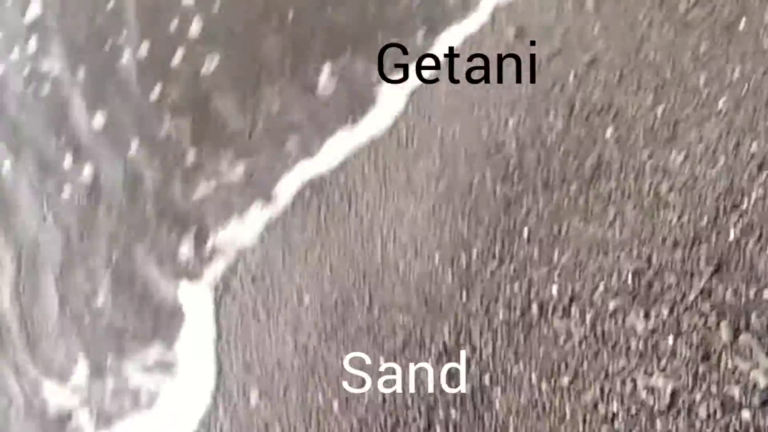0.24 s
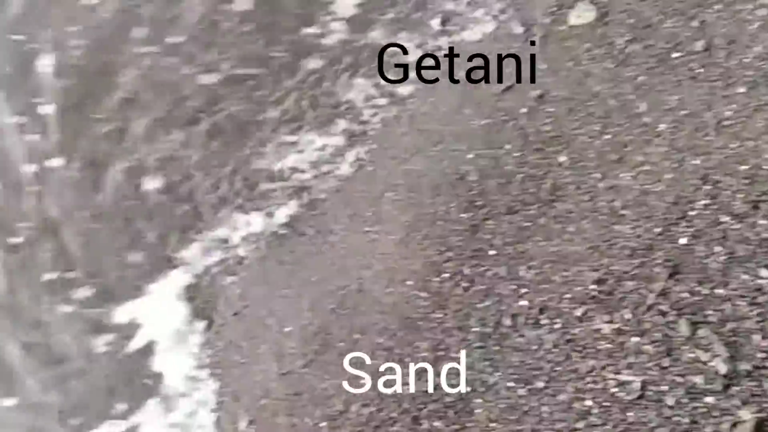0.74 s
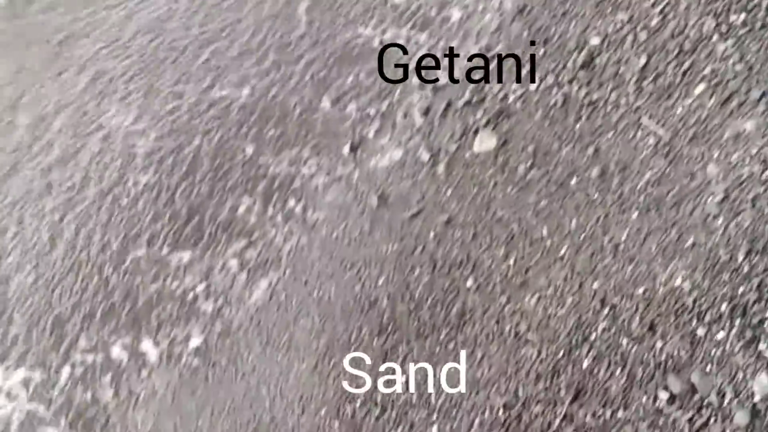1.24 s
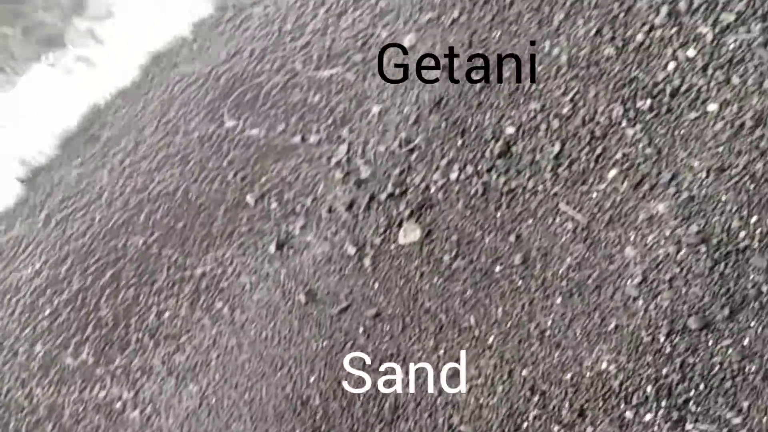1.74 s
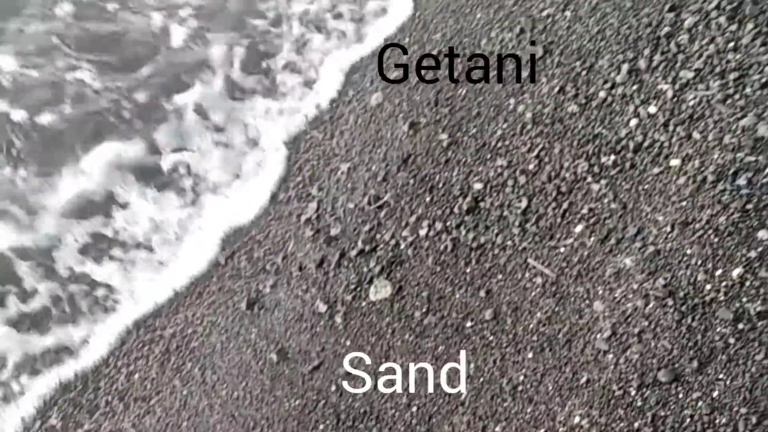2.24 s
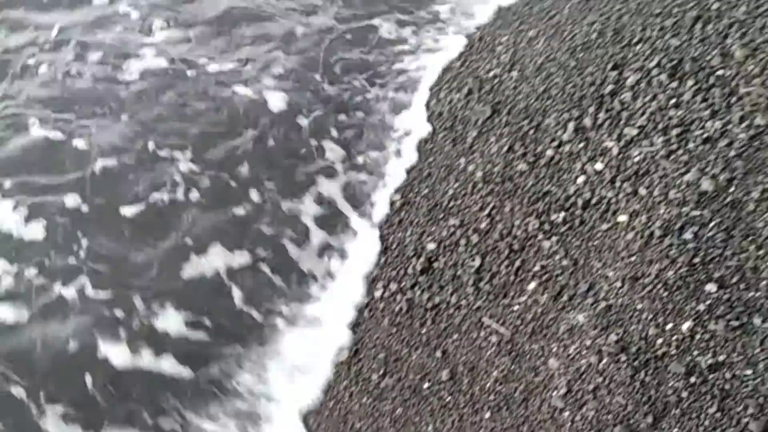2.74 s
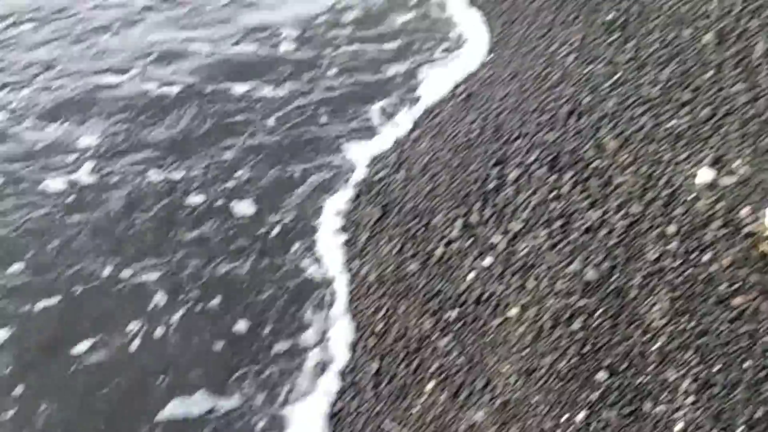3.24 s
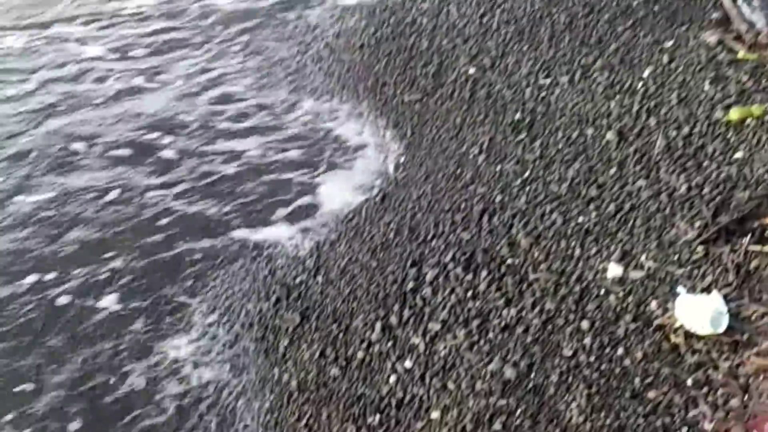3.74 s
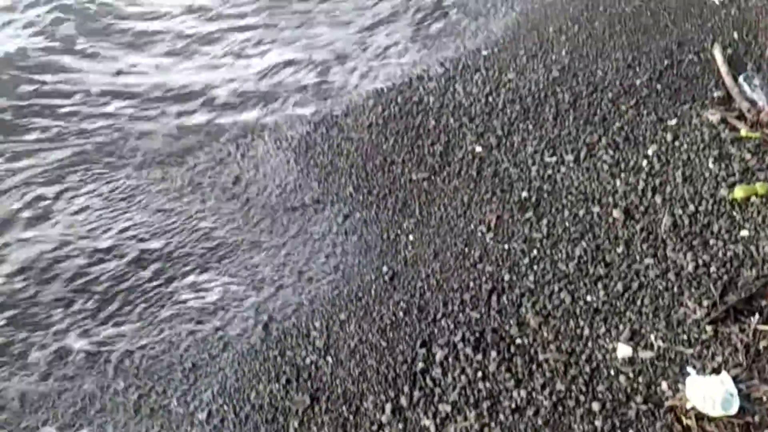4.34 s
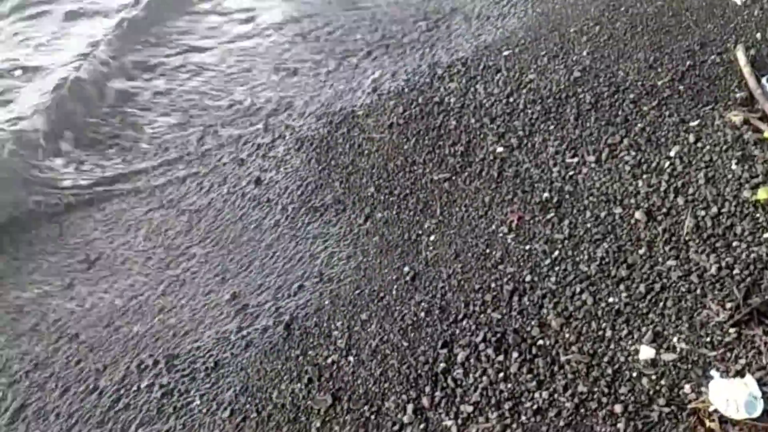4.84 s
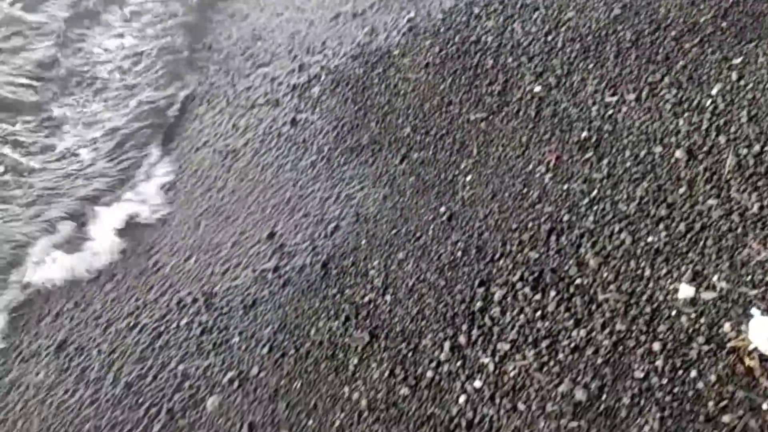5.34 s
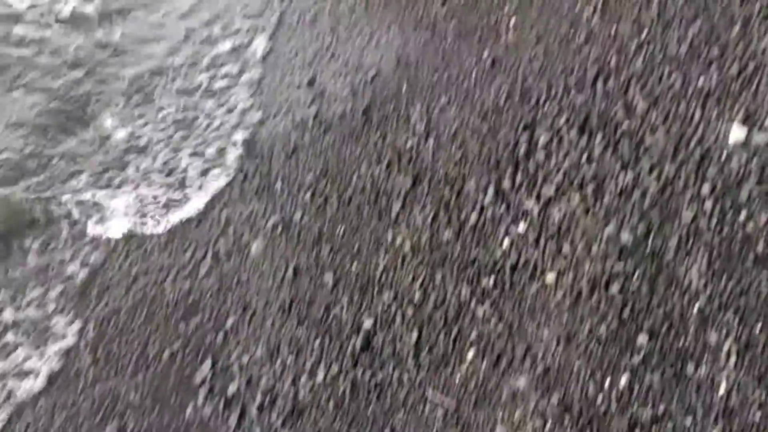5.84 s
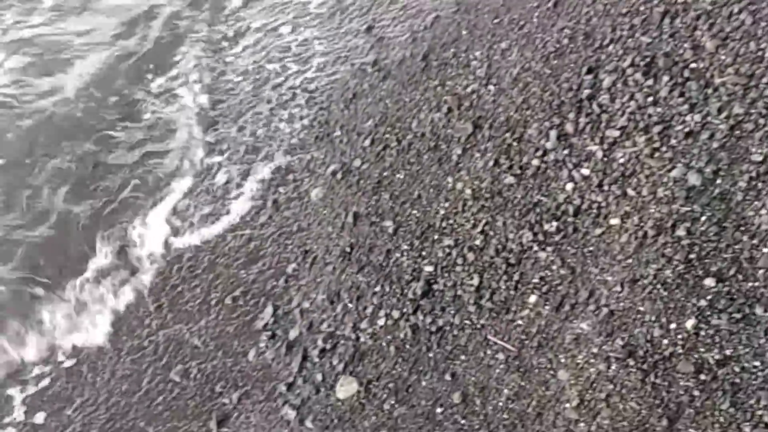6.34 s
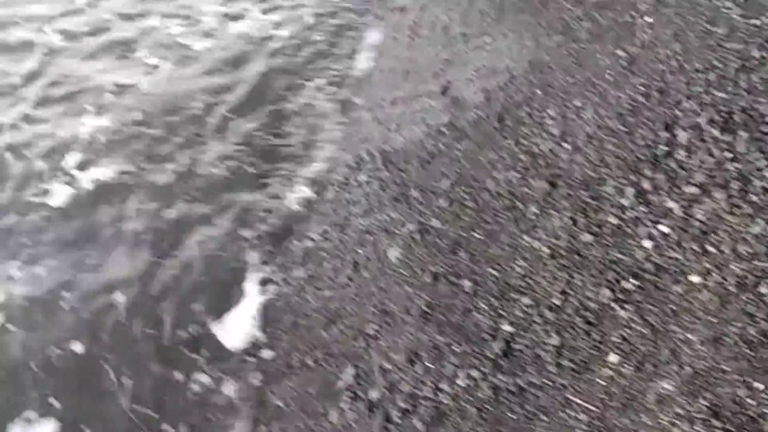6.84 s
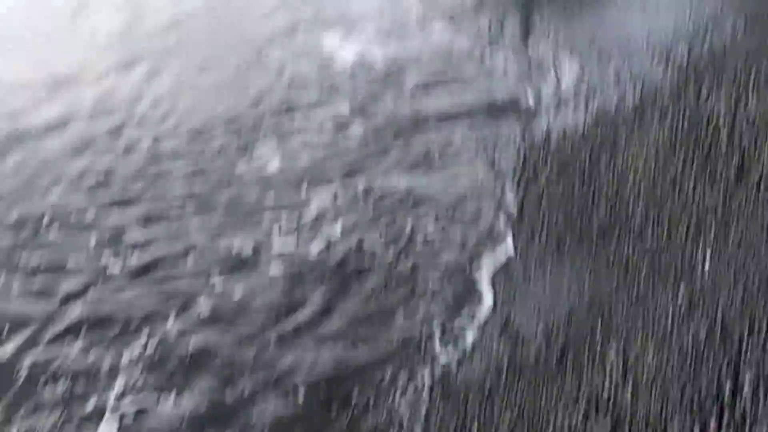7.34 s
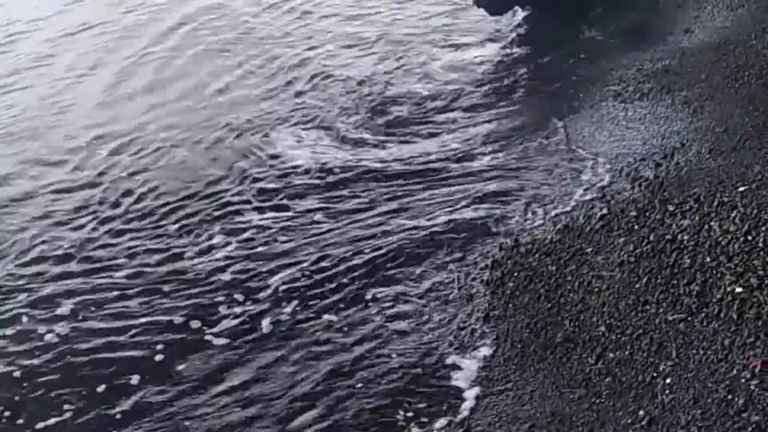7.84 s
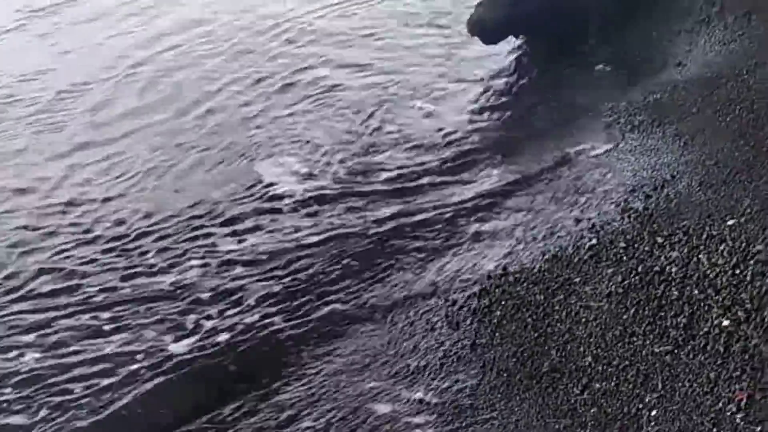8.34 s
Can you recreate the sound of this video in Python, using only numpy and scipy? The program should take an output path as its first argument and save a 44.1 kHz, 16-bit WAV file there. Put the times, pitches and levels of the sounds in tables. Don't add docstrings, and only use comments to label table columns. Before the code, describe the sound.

Outdoors by the water, wavelets hiss up dark pebbles and recede, bubbling between the stones, with a sharp wet knock early on and faint chirps.

```python
import sys
import numpy as np
from scipy import signal
from scipy.fft import rfft, irfft, next_fast_len
from scipy.io import wavfile
from scipy.ndimage import map_coordinates

SR = 44100
rng = np.random.default_rng(int(sys.argv[2]) if len(sys.argv) > 2 else 0)


def transcribe(signal):
    frames = np.atleast_2d(signal).T
    limited = np.clip(frames, -1, 1)
    pcm = np.round(limited * 32767).astype(np.int16)
    wavfile.write(sys.argv[1], SR, pcm)


def gain_from_db(level_db):
    decades = np.asarray(level_db, float) / 20
    return 10 ** decades


N = 379260
SLOW_STEP = 40

# start_s, left_lag_ms, spray_db caught, surge_db caught
BEARING = [(0.0, -0.27, 0.5, 1.9), (0.9, -0.22, -0.5, -3.0), (1.3, -0.22, 1.2, 1.7), (1.55, 0.3, -1.4, 2.3),
           (2.5, 0.39, 2.6, 7.7), (3.0, 0.38, 0.4, 5.1), (3.4, 0.37, 2.7, 1.2), (4.0, 0.3, 3.3, 2.5),
           (4.5, -0.16, 4.7, 2.0), (5.2, -0.13, -1.0, -1.7), (6.0, -0.33, -1.7, -1.8),
           (6.4, -0.34, -1.2, -3.9), (7.0, -0.35, -2.9, -7.0), (7.6, -0.1, -5.3, 3.7),
           (8.6, -0.22, 2.1, 2.6)]
LAG_BAND_HZ = (380, 5700)
# crest_s, foam_db, build_s and drain_s per 10 dB, depth_db of extra body
WAVELETS = [(0.045, -63.4, 0.27, 0.09, 4.0), (0.323, -51.9, 0.05, 0.13, -4.2),
            (0.485, -51.2, 0.15, 0.8, 3.1), (0.836, -48.8, 0.25, 0.03, 4.5),
            (0.947, -42.3, 0.21, 0.85, -1.0), (1.234, -37.5, 0.32, 0.35, 0.9),
            (1.37, -37.0, 0.09, 0.32, -1.9), (1.575, -30.8, 0.06, 0.05, 0.8),
            (1.672, -36.2, 0.16, 0.27, -4.0), (1.884, -39.7, 0.08, 0.38, 2.3),
            (2.367, -42.2, 1.06, 0.57, -3.3), (2.967, -48.8, 0.72, 0.45, -2.3),
            (3.887, -58.3, 1.43, 1.56, -0.8), (4.913, -47.8, 0.25, 0.12, 0.7),
            (5.024, -42.8, 0.21, 0.61, 0.5), (5.337, -42.0, 0.1, 0.61, -1.2),
            (5.767, -48.5, 1.4, 0.3, -0.5), (6.34, -41.0, 0.35, 0.38, 0.2), (6.845, -47.3, 0.05, 0.06, 0.6),
            (7.122, -44.6, 0.66, 0.47, -0.9), (7.553, -48.5, 0.2, 0.42, -9.9),
            (8.484, -65.2, 0.11, 0.04, 5.0), (8.578, -47.6, 0.09, 0.12, -3.6), (7.705, -56, .04, .05, 0)]


def at_hz(points, hz):
    table_hz, values = np.array(points).T
    return np.interp(np.log(hz + 1), np.log(table_hz), values)


def slow_times():
    return np.arange(0, N + SLOW_STEP, SLOW_STEP) / SR


def smooth(control):
    return np.interp(np.arange(N) / SLOW_STEP, np.arange(len(control)), control)


def bearing():
    start_s, *columns = np.transpose(BEARING)
    return [np.interp(slow_times(), start_s, column) for column in columns]


def drift(rate_hz):
    settle = 2000
    r = np.exp(-2 * np.pi * rate_hz * SLOW_STEP / SR)
    noise = rng.standard_normal(N // SLOW_STEP + 2 + settle)
    slow = signal.lfilter([1], [1, -2 * r, r * r], noise)[settle:]
    return slow / slow.std()


def noise_through(order, edge_hz, kind, shape):
    sos = signal.butter(order, edge_hz, kind, fs=SR, output="sos")
    return signal.sosfilt(sos, rng.standard_normal(shape))


def add(out, s, sound):
    at = round(s * SR)
    out[..., at:at + sound.shape[-1]] += sound[..., :N - at]


def panned(sound, left_db):
    return sound * gain_from_db(np.minimum([[left_db], [-left_db]], 0))


def puff(hz, cycles, rise):
    half = int(3 * cycles * SR / hz)
    turns = np.arange(-half, half) * hz / SR
    sound = -np.cos(2 * np.pi * turns * (1 + rise * turns / cycles)) * np.exp(-(turns / cycles) ** 2)
    return sound, half / SR


def wash(shared_db, near_db, own_db):
    layer_hz = [280, 650, 2300, 6500]
    lean_db_per_ms = [.1, -8, 2.2, .1]
    deep_hz, deep_db_per_ms = 190, 8
    lag_ms = bearing()[0]
    wander_db = 1.5 * np.array([drift(rate_hz=3.0) for _ in layer_hz])
    turn_db = np.outer(lean_db_per_ms, lag_ms) + wander_db
    turn_db -= turn_db.mean(axis=1, keepdims=True)
    layers_db = np.array([db - 10 * np.log10(np.mean(gain_from_db(2 * db))) for db in swell()])
    ports, hz, size = through_ports(lag_ms)
    patches = 22
    centres = np.log(np.geomspace(100, 15000, num=patches))
    out, together, near = 0, drift(8.1), drift(7.0)
    for k, centre in enumerate(centres):
        window = np.interp(np.log(hz + 1), centres, np.arange(patches) == k)
        band = irfft(ports * window, size)[:, :N]
        share = [np.interp(centre, np.log(layer_hz), row) for row in np.eye(4)]
        near = 0.83 * near + 0.61 * drift(9.0)
        flicker_db = shared_db * together + near_db * near + own_db * drift(18.0)
        level_db = share @ layers_db + deep_db_per_ms * lag_ms * (centre < np.log(deep_hz))
        level_db = level_db + (1 - 0.24 * share[3]) * flicker_db
        sides_db = level_db + share @ turn_db * [[.5], [-.5]]
        out = out + band * [smooth(gain) for gain in gain_from_db(sides_db)]
    return out


def swell():
    body_share = [.91, 1.35, -.17, -.08]
    drain_stretch = [.71, 1.1, 1.06, .88]
    far_surf_db = [-68, -74, -70.5, -59.8]
    t = slow_times()
    _, spray_db, surge_db = bearing()
    layers_db = []
    for body, stretch, far_db in zip(body_share, drain_stretch, far_surf_db):
        power = np.full(len(t), gain_from_db(2 * far_db))
        for crest_s, foam_db, build_s, drain_s, depth_db in WAVELETS:
            below_crest_db = 10 * np.maximum((crest_s - t) / build_s, (t - crest_s) / (stretch * drain_s))
            power += gain_from_db(2 * (foam_db + body * depth_db - below_crest_db))
        layers_db.append(10 * np.log10(power))
    return np.array(layers_db) + [surge_db, 0 * t, 0 * t, spray_db]


def through_ports(lag_ms):
    # pitch_hz, level_db per Hz
    left_port = [(110, -88), (200, -74.5), (300, -68.5), (520, -73.5), (900, -71), (1250, -71),
                 (1750, -75.5), (2350, -69.5), (3200, -77), (4550, -72.5), (4900, -93.5), (5500, -92),
                 (10500, -85.5), (14300, -92)]
    right_port = [(100, -100), (170, -89.5), (405, -84.5), (480, -73), (600, -70), (900, -72.5),
                  (1700, -75.5), (4550, -74.5), (4900, -80.5), (6200, -85.5), (7400, -88.5), (7700, -89.5),
                  (8500, -104), (14300, -103)]
    # pitch_hz, share 0-1
    likeness = [(60, .7), (170, 0.85), (330, 0.84), (430, .3), (650, 0.62), (1300, 0.48), (2500, 0.13),
                (4000, 0.1), (5600, 0), (5800, 0.06), (6200, 0.3), (6400, 1), (7500, 0.92), (7800, 0.37)]
    common = foam(count=2500, low_hz=198.2, high_hz=9100, size_db=-12.3, spread_db=2.5, cycles=1.9)
    apart = foam(count=1500, low_hz=298, high_hz=9030, size_db=-14.3, spread_db=2.6, cycles=1.3)
    heard_at = np.arange(N) + smooth(lag_ms) * SR / 1000
    early = map_coordinates(common, [heard_at], order=3, mode="nearest")
    size = next_fast_len(N)
    hz = np.arange(size // 2 + 1) * SR / size
    alike = np.clip(at_hz(likeness, hz), 0, 1)
    lagging = (hz > LAG_BAND_HZ[0]) & (hz < LAG_BAND_HZ[1])
    left = rfft(common, size)
    shared = np.where(lagging, rfft(early, size), left)
    right = alike * shared + np.sqrt(1 - alike ** 2) * rfft(apart, size)
    ports = np.array([left * gain_from_db(at_hz(left_port, hz)), right * gain_from_db(at_hz(right_port, hz))])
    ports *= np.sqrt(SR / 2) * np.minimum(hz / 100, 1) ** 3
    return ports, hz, size


def foam(count, low_hz, high_hz, size_db, spread_db, cycles):
    out = rng.standard_normal(N)
    for when, pitch, size, length in rng.random((count, 4)):
        hz = low_hz * (high_hz / low_hz) ** pitch
        height = gain_from_db(size_db - spread_db * np.log(size + .01))
        height *= (hz / 1000) ** 0.31
        ring_cycles = (cycles + .003 * hz) * (.5 + length)
        add(out, when * N / SR, height * bubble(hz, ring_cycles, rise=.01))
    return out


def bubble(hz, cycles, rise):
    turns = np.arange(int(5 * cycles * SR / hz)) * hz / SR
    ring = np.sin(2 * np.pi * turns * (1 + rise * turns / cycles))
    return ring * np.exp(-turns / cycles) * (1 - np.exp(-3 * turns))


def slaps():
    # start_s, level_db at the peak, pitch_hz, left_lag_ms, left_louder_db
    slap_events = [
        (1.5707, -5, 700, .4, -3),
        (8.5434, -29, 510, -.4, 4),
    ]
    out = np.zeros((2, N))
    for s, db, right_hz, lag_ms, left_db in slap_events:
        sound, half = puff(1.25 * right_hz, cycles=0.81, rise=0.082)
        add(out[0], s + lag_ms / 1000 - half, gain_from_db(db + left_db) * sound)
        sound, half = puff(right_hz, cycles=1.1, rise=0.012)
        add(out[1], s - half, gain_from_db(db) * sound)
    return out


def plops():
    # start_s, level_db at the peak, pitch_hz, left_louder_db
    single = [(0.472, -39, 624, 1), (6.652, -36, 720, 2), (0.572, -39, 2347, 4), (1.122, -27, 689, 2),
              (1.151, -28, 452, 10), (1.393, -29, 3187, -10), (1.618, -28, 732, -6), (1.959, -31, 1012, 9),
              (2.406, -32, 1335, 5), (3.23, -41, 1055, 5), (3.906, -43, 1850, -4), (4.562, -42, 937, 2),
              (4.41, -43, 1050, 5), (4.659, -38, 991, 10), (4.669, -39, 495, -9), (4.891, -29, 1249, 0),
              (5.01, -33, 1249, 8), (4.927, -33, 1100, 2), (5.333, -32, 2310, 4), (5.486, -28, 1184, 9),
              (5.542, -31, 1378, 6), (6.351, -33, 538, 8), (6.364, -31, 754, 6), (6.457, -32, 2304, 12),
              (7.552, -41, 1960, 13), (7.708, -41, 1960, 14), (3.826, -46, 850, 5), (8.501, -48, 947, 4),
              (8.568, -43, 1270, 7), (8.577, -39, 2390, 10)]
    # start_s, level_db at the peak, pitch_hz
    gulps = [(0.43, -45, 215), (0.467, -43, 301), (1.123, -31, 258), (1.148, -28, 301), (1.183, -31, 320),
             (1.678, -31, 260), (1.718, -33, 190), (1.553, -33, 215), (1.578, -27, 172), (1.608, -35, 172),
             (1.887, -34, 172), (1.904, -34, 172), (1.942, -35, 172), (1.987, -36, 172), (3.987, -47, 194),
             (4.3, -46, 409), (4.455, -42, 258), (5.0, -37, 301), (6.258, -37, 301), (6.317, -36, 215),
             (6.364, -39, 301), (5.8, -42, 200), (2.5, -39, 170), (7.05, -45, 150), (7.708, -48, 409),
             (8.548, -38, 280)]
    gulp_left_db = 15
    out = np.zeros((2, N))
    for s, db, hz, left_db in single + [(*gulp, gulp_left_db) for gulp in gulps] + froth():
        sound, half = puff(hz, cycles=1 + .0048 * hz, rise=.012)
        left, right = panned(gain_from_db(db - .7) * sound, left_db)
        lag_s = np.interp(s, *np.transpose(BEARING)[:2]) / 1000 * (hz > LAG_BAND_HZ[0])
        add(out[0], s - half + lag_s, left)
        add(out[1], s - half, right)
    return out


def froth():
    froth_hz = (500, 3000)
    spread_s, over_foam_db = .06, 6
    low_hz, high_hz = froth_hz
    rows = []
    for (crest_s, foam_db, *_), pair in zip(WAVELETS, rng.random((len(WAVELETS), 2, 4))):
        for when, weakness, pitch, side in pair:
            s = np.clip(crest_s + spread_s * (2 * when - 1), .05, N / SR - .02)
            db = foam_db + over_foam_db - 5 * weakness
            rows.append((s, db, low_hz * (high_hz / low_hz) ** pitch, 24 * side - 8))
    return rows


def grit():
    # start_s, level_db at the peak
    tick = (.1300, -37)
    out = np.zeros((2, N))
    s, db = tick
    sound, half = puff(11000, cycles=1.5, rise=.01)
    add(out, s - half, panned(gain_from_db(db) * sound, left_db=10))
    return out


def birds(echo_db, t60):
    # start_s, first_hz, last_hz, level_db at the peak, left_louder_db
    chirps = [(0.138, 3670, 3480, -33.5, -2.5), (0.435, 4400, 4340, -35.5, -1),
              (0.462, 4300, 3950, -36, -5), (0.492, 4080, 4030, -39, -3), (0.512, 4100, 4000, -41, -3),
              (.816, 4070, 3750, -34.5, -8), (0.829, 4120, 3890, -37, -5), (0.86, 3880, 3780, -39, -5),
              (7.013, 4320, 4400, -32, -12), (7.038, 4650, 4340, -37, -17), (7.046, 3830, 3980, -36, -4),
              (7.5, 4250, 3950, -43, -4), (7.432, 3850, 4150, -45, 0), (7.66, 4350, 4250, -46, -4),
              (7.451, 4250, 4400, -39, -5), (7.465, 4300, 4150, -39, 6), (7.578, 4400, 3900, -41.5, -15)]
    chirp_s = .021
    out = np.zeros((2, N))
    for s, first_hz, last_hz, db, left_db in chirps:
        u = np.linspace(0, 1, round(chirp_s * SR))
        glide_hz = first_hz + (last_hz - first_hz) * u
        tone = np.sin(2 * np.pi * np.cumsum(glide_hz) / SR) * np.sin(np.pi * u) ** 1.9
        add(out, s, panned(gain_from_db(db) * tone, left_db))
    t = np.arange(SR // 2) / SR
    echoes = rng.standard_normal((2, SR // 2)) * gain_from_db(echo_db - 60 * t / t60) * (t > .008)
    return out + signal.fftconvolve(out, echoes, axes=1)[:, :N]


def air(level_db):
    hiss = noise_through(3, 9000, "high", (2, N))
    ports = np.array([hiss[0], gain_from_db(-17) * (.6 * hiss[0] + .8 * hiss[1])])
    spray_db = bearing()[1]
    return smooth(gain_from_db(level_db + .5 * spray_db)) * ports


def taps():
    # start_s, level_db at the peak, pitch_hz
    tap_events = [(1.24, -52, 100), (1.925, -33, 166), (1.964, -36, 175), (2.76, -54, 80),
                  (3.416, -46, 121), (3.465, -55, 90), (3.605, -47, 90), (3.757, -40.5, 125),
                  (4.41, -54, 100), (4.74, -46, 101), (4.96, -45, 100), (5.05, -43, 104), (5.30, -47, 90),
                  (5.324, -44, 120), (5.62, -60, 90), (7.275, -42, 230), (6.48, -52, 100), (6.92, -51, 120),
                  (7.21, -56, 100), (8.44, -53, 110)]
    out = np.zeros((2, N))
    for s, db, hz in tap_events:
        sound, half = puff(hz, cycles=1.34, rise=-0.053)
        add(out, s - half, panned(gain_from_db(db) * sound, left_db=22))
    return out


def motor(hum_hz, hum_db):
    hum = noise_through(2, [hum_hz - 3, hum_hz + 3], "band", N)
    return panned(gain_from_db(hum_db + 3) * hum / hum.std(), left_db=15)


def rumble(level_db):
    low = noise_through(2, [65, 220], "band", (2, N))
    low = np.array([low[0], .9 * low[0] + .4 * low[1]])
    return gain_from_db(level_db) * low / low.std() * gain_from_db([[4.0], [-11.0]])


def scene():
    water = wash(shared_db=.1, near_db=.7, own_db=1.2) + slaps() + plops() + grit()
    behind = birds(echo_db=-29.5, t60=.38) + air(level_db=-52)
    lows = taps() + motor(hum_hz=90, hum_db=-69.5) + rumble(level_db=-66.3)
    return water + behind + lows


def top_cut(x):
    return signal.sosfilt(signal.butter(12, 14340, fs=SR, output="sos"), x)


def record(dry):
    dry = signal.sosfilt(signal.butter(1, 45, "high", fs=SR, output="sos"), dry)
    mix = signal.sosfilt(signal.ellip(14, .3, 55, 14340, fs=SR, output="sos"), dry)
    return top_cut(mix)


dry = scene()
out = record(dry)
transcribe(out)
```